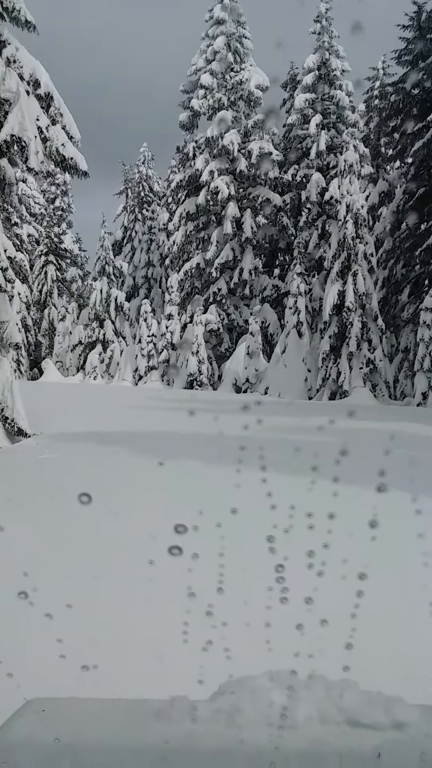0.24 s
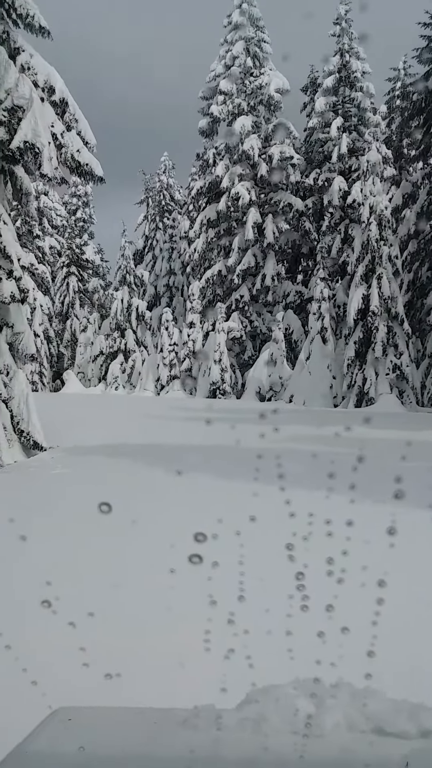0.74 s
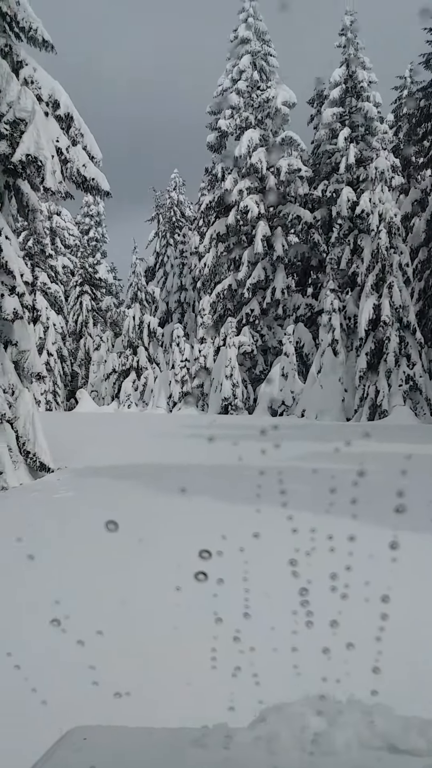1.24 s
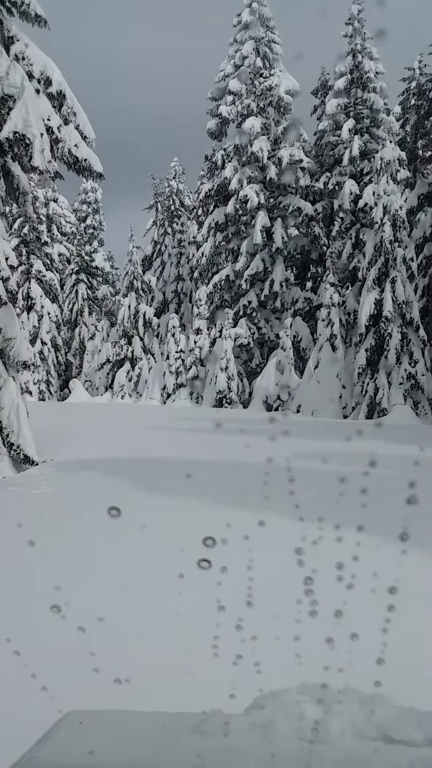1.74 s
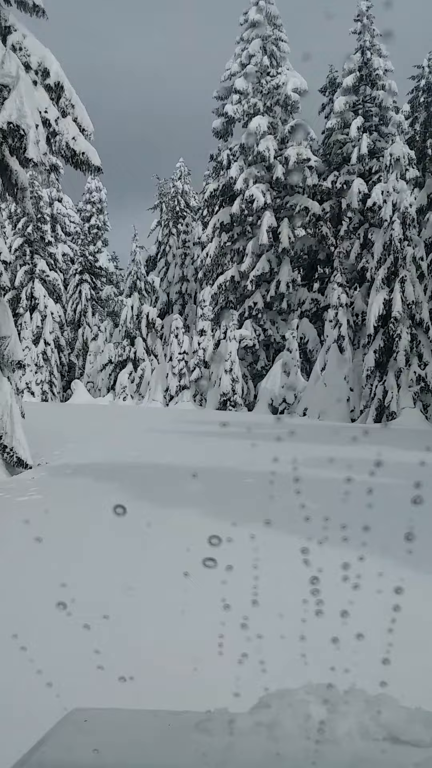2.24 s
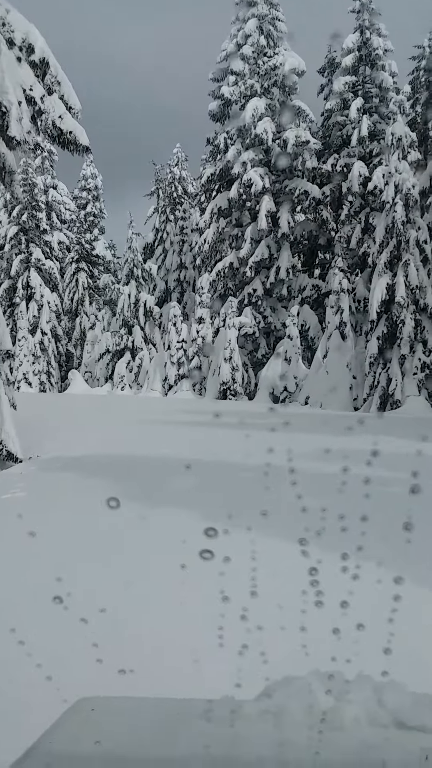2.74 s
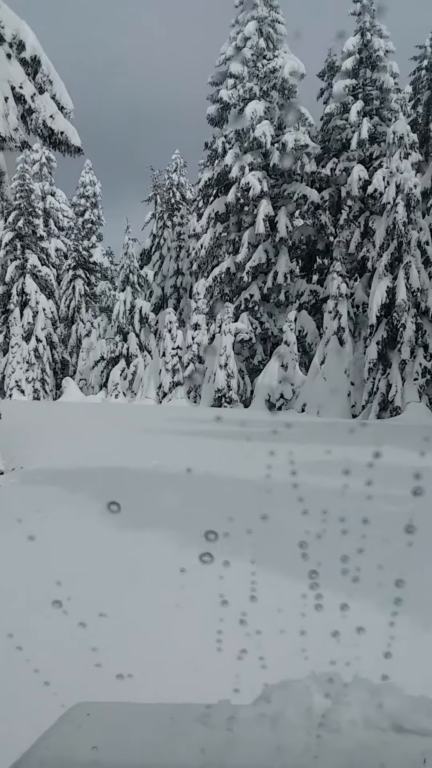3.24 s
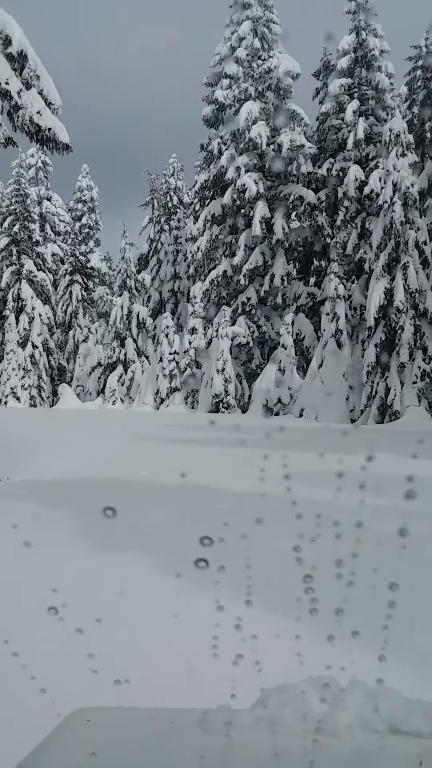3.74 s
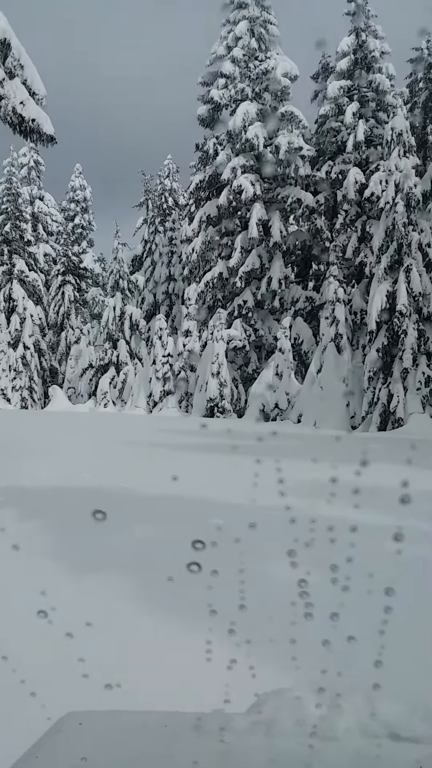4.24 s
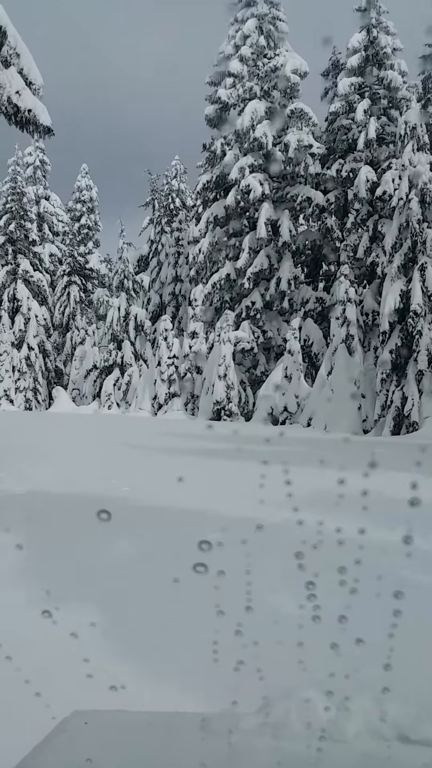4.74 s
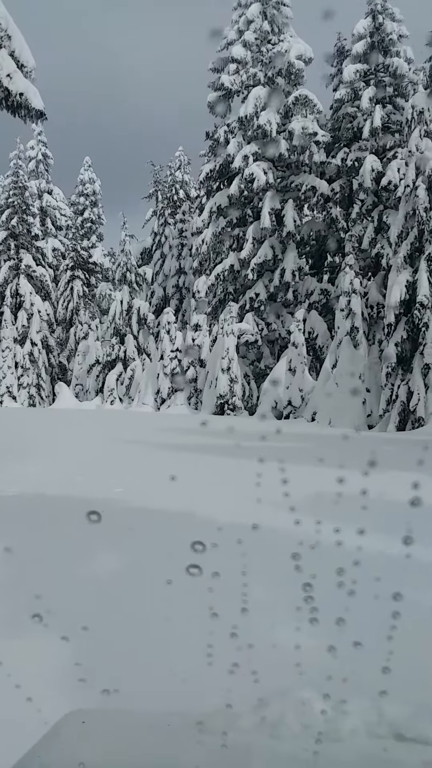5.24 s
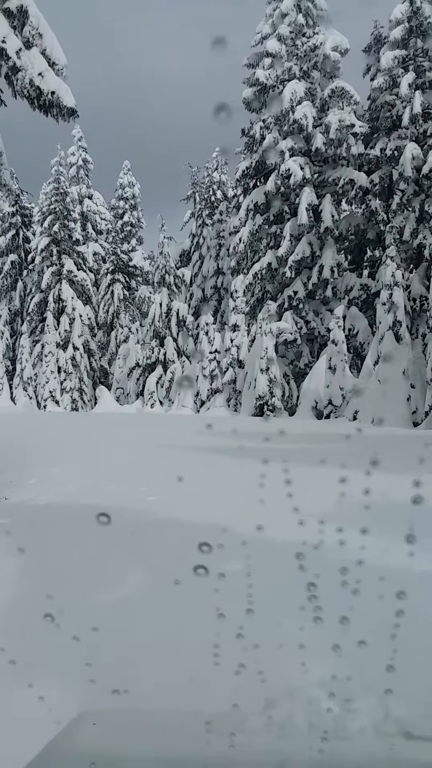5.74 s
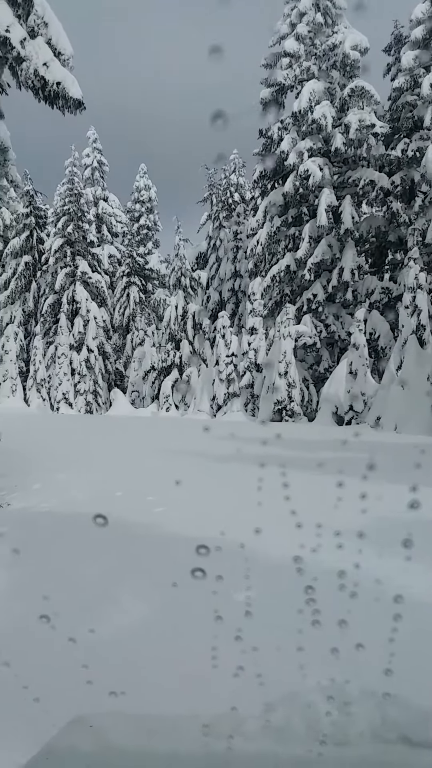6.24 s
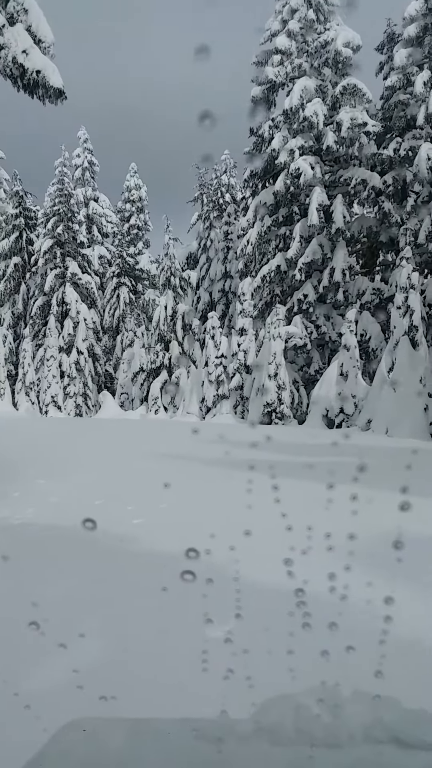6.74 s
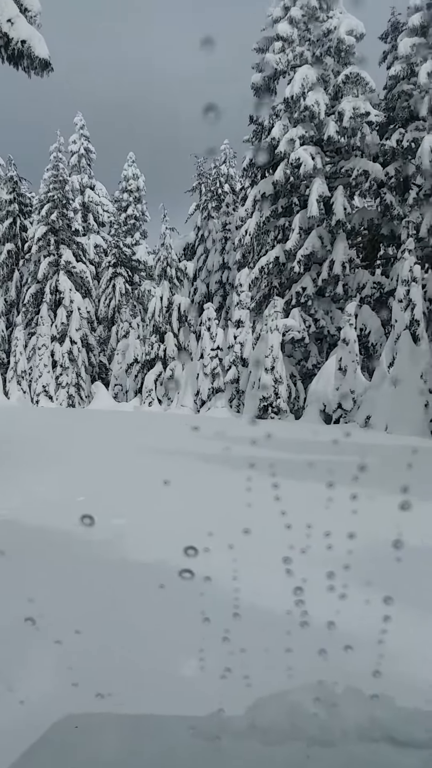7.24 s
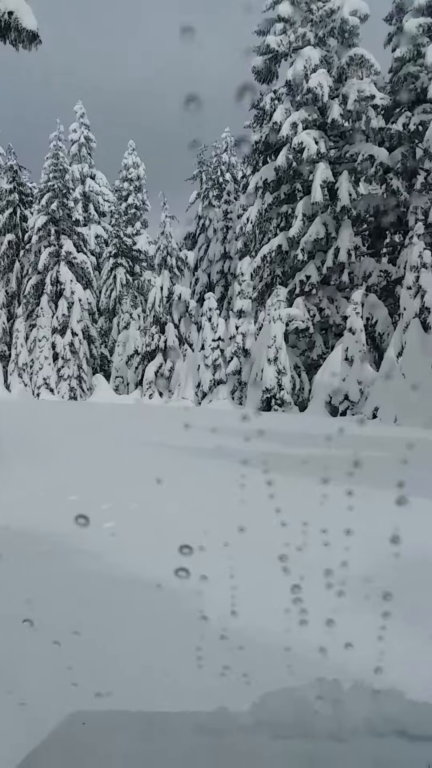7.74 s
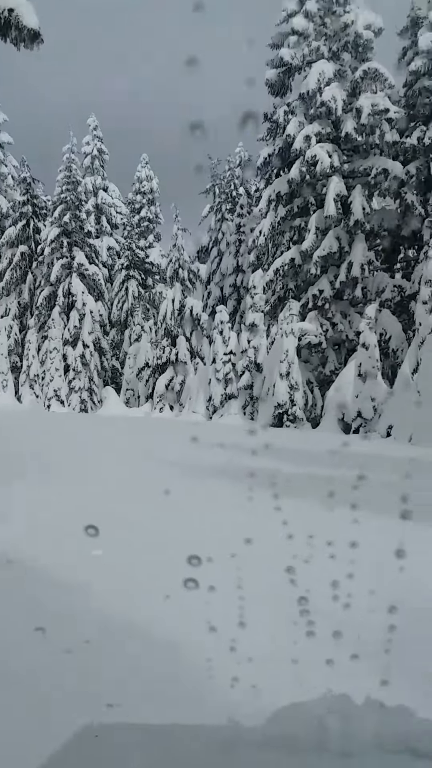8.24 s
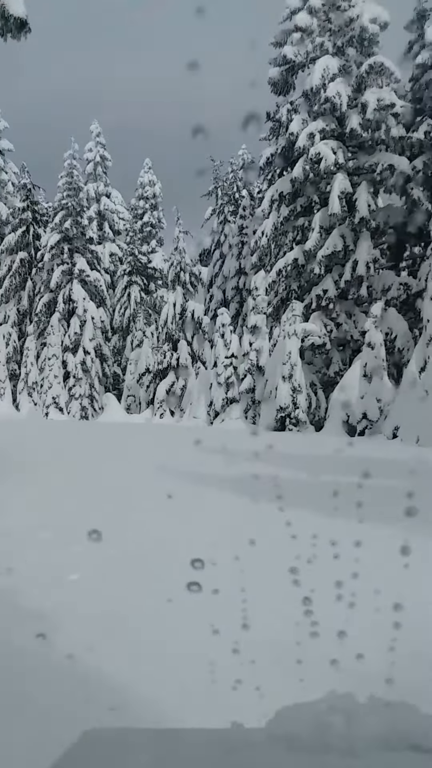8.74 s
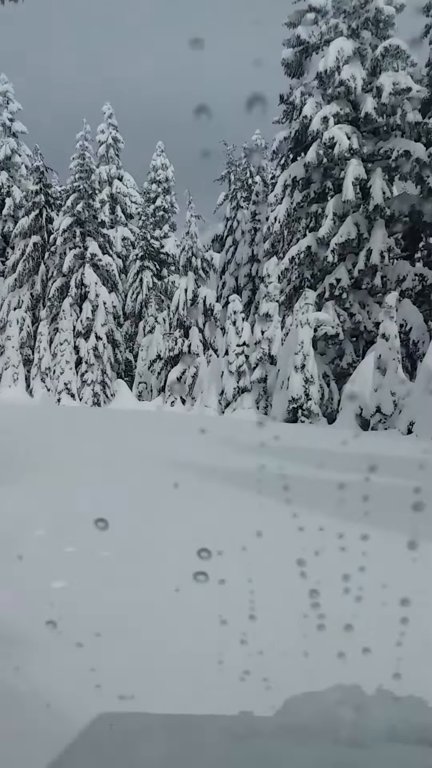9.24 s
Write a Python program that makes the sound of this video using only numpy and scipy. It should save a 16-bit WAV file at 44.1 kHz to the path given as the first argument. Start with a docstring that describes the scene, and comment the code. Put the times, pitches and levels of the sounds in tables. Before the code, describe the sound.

Inside a tracked snow vehicle's cab, a loud steady engine drone sags under load and partly recovers, over track rumble, panel rattle and hiss.

```python
"""Inside the cab of a tracked snow vehicle crawling uphill, two microphones a little apart.
A four-cylinder engine drones under the floor: sines at its firing orders sag and recover with its speed.
Belt-driven fan and pumps add tones of their own; combustion roar rings all the cab's panel modes, knocks
some of them. Behind lies coloured noise: track rumble, clatter and air hiss, swelling once as the tracks
lurch over a hump. The recorder limits the peaks."""
import sys
import numpy as np
from scipy import signal
from scipy.fft import rfft, irfft, next_fast_len
from scipy.io import wavfile
from scipy.ndimage import uniform_filter1d

SR = 44100
rng = np.random.default_rng(int(sys.argv[2]) if len(sys.argv) > 2 else 0)


def dump_mix(stems):
    """Bounce the given channels to the path in sys.argv[1] as a 16-bit WAV at rate SR."""
    frames = np.atleast_2d(stems).T  # one column per channel
    limited = np.clip(frames, -1, 1)  # hard clip at full scale
    pcm = np.round(limited * 32767).astype(np.int16)
    wavfile.write(sys.argv[1], SR, pcm)


N = 418950

# load rises from idle to full as the firing rate sags from easy to lugging, a moment late
EASY_HZ, LUGGING_HZ, LOAD_LAG_S, IDLE_LOAD = 87.8, 84.9, 0.055, 0.11
SLOWEST_HZ = 82.8    # tones that grow much under load peak here
COARSE = 8           # tones stay low, so every 8th sample carries them
KNOCK_TURNS = .37    # knocks and hiss puffs come ahead by this part of a firing
KNOCK_DB, ROAR_DB, BED_DB = -34, -24, -14.5    # rms of each layer

# floor panels lift or swallow any tone that glides through their resonance: (f/Hz, half-width/Hz, lift/dB)
FLOOR_PANELS = [(228.5, 2.5, -5), (444, 7, -4), (564, 15, 9), (349, 5, -6), (838, 10, 2), (938, 14, 3),
                (1045, 18, -10)]


def from_db(db):
    """Decibels to gain."""
    return 10 ** (np.asarray(db) / 20)


def rms_one(x):
    """Scale to unit rms."""
    return x / np.sqrt(np.mean(x ** 2) + 1e-20)


def at_hz(points, hz):
    """Read a table on a log-frequency axis."""
    table_hz, values = np.transpose(points)
    return np.interp(np.log(hz), np.log(table_hz), values)


def drift(corner_hz, step=1):
    """Slow chance: noise at every 40th sample through a double one-pole low-pass; spread 1."""
    pole = np.exp(-2 * np.pi * corner_hz * 40 / SR)
    white = rng.standard_normal(N // 40 + 2002)
    slow = signal.lfilter([1], [1, -2 * pole, pole ** 2], white)[2000:]    # drop the settling
    return np.interp(np.arange(0, N, step) / 40, np.arange(len(slow)), rms_one(slow - slow.mean()))


def lurches():
    """The tracks lurch over a hump: a bell-shaped swell in dB."""
    # humps under the tracks: (t/s, swell/dB)
    humps = [(6.8, 6.5)]
    half_width_s = 0.15
    t = np.arange(N) / SR
    return sum(swell_db * np.exp(-((t - s) / half_width_s) ** 2) for s, swell_db in humps)


def noise_bed(firings, swell_db, bumps):
    """Rumble, clatter and hiss: stereo noise in overlapping bands, each with its own level and flicker."""
    # spectrum of rumble and hiss before the layer is levelled: (f/Hz, level per Hz/dB)
    spectrum = [(25, -32), (48, -20), (54, -5.5), (100, -5.5), (122, -9), (165, -4.5), (215, -8.5),
                (280, -15), (315, -14.5), (370, -18), (430, -18), (490, -23), (600, -30), (1100, -29.5),
                (1700, -37), (2200, -37), (3250, -41), (4000, -42), (5700, -47.5), (7400, -45.5),
                (8600, -50), (9700, -58), (13000, -48.5), (14800, -49.5), (15600, -50)]
    # likeness of the two microphones: (f/Hz, correlation 0 to 1)
    likeness = [(30, .99), (60, .98), (200, .95), (300, .8), (500, .7), (800, .1), (3000, .15), (12000, .3)]
    # lean to one side: (f/Hz, left minus right/dB)
    leaning = [(30, -3), (60, 0), (200, 4), (500, 1.5), (1000, -1), (2000, 1.5), (4000, -3), (6000, -2.5),
               (10000, 0.5), (14000, -5)]
    rumble_db, clatter_db, hiss_db = -0.52, 2.0, -1.4
    valve_db, puff_db, flicker_db = .6, .5, 1.0
    lag_s = .0004    # the left microphone hears the hiss later

    size = next_fast_len(N)
    hz = np.fft.rfftfreq(size, 1 / SR) + 1
    mid, side = rfft(rng.standard_normal((2, size)))
    alike = np.clip(at_hz(likeness, hz), 0, 1)
    pair = np.sqrt(1 + alike) * mid + np.sqrt(1 - alike) * side * [[1], [-1]]
    pair[0] *= np.exp(-2j * np.pi * np.maximum(hz - 600, 0) * lag_s)    # lag only above the cab's boom
    pair *= from_db(at_hz(spectrum, hz) + at_hz(leaning, hz) / 2 * [[1], [-1]])

    shaken_db = hiss_db + .3 * swell_db + 0.15 * bumps
    valve_gear_db = valve_db * np.cos(np.pi * firings)    # pulses every second firing
    puffs_db = puff_db * np.cos(2 * np.pi * (firings + KNOCK_TURNS))
    bands = [(40, rumble_db + swell_db), (160, rumble_db + swell_db), (640, clatter_db + swell_db / 2),
             (2560, shaken_db + valve_gear_db), (10240, shaken_db + puffs_db)]
    out = np.zeros((2, N))
    for centre_hz, band_db in bands:
        # each band fades out two octaves from its centre; the outer ones run on to the ends
        distance = abs(np.log(np.clip(hz, 40, 10240) / centre_hz) / np.log(4))
        share = np.clip(1 - distance, 0, 1)
        out += from_db(band_db + flicker_db * drift(11.4)) * irfft(pair * share, size)[:, :N]
    return from_db(BED_DB) * rms_one(out)


def knocks(firings):
    """One click per firing, a little early or late, each cylinder with its own strength."""
    # knock strength of each cylinder in firing order, relative: (level/dB)
    cylinders_db = [0.5, -4, 1.5, -2.5]
    at = np.flatnonzero(np.diff(np.floor(firings + KNOCK_TURNS)))
    chance = rng.standard_normal((len(at), 2))
    shift = (.00004 * SR * chance[:, 1]).astype(int)    # 40 microseconds spread
    clicks = np.zeros(N)
    clicks[np.clip(at + shift, 0, N - 1)] = from_db(np.resize(cylinders_db, len(at)) + 2.5 * chance[:, 0])
    return clicks


def roar_gate(firings, swell_db, bumps):
    """Gain of the combustion roar: it swells at each firing and shakes with the ride."""
    pulse = 1 + .08 * np.cos(2 * np.pi * firings + 1.8)
    return from_db(0.15 * swell_db + 0.35 * bumps) * pulse


def cab(knock, gate):
    """Roar rings every panel mode, knocks only those from 1150 to 1700 Hz; each microphone meets a mode
    at its own level and phase."""
    # cab panel modes: (f/Hz, width/Hz, left level/dB, right level/dB, left leads/turns)
    modes = [(561, 26, -3.5, -8.5, -0.098), (627, 17, -7, -6, -0.22), (733, 68, -6, -9, -0.25),
             (849.4, 21, -2.5, -5, -0.13), (932, 53, -5, -0.5, -0.37), (986, 24, -14, -8, -0.53),
             (1042, 36, -10, -7, 0.39), (1244, 19, -2.5, 0, 0.36), (1308, 84, -8, -15.5, 0.26),
             (1398, 31, -8, -8.5, 0.12), (1444, 40, -7.5, -2, 0.19), (1581, 38.4, -11.5, -1, 0.061),
             (1800, 69, -11.5, -5.5, 0.44), (1955, 70, -11.5, -12.5, 0.045), (2060, 62, -16, -12.5, -0.14),
             (2268, 140, -29, -15.5, 0.15), (2501, 44, -12.5, -16, 0.27), (2673, 62, -23.5, -13.5, -0.085),
             (2703, 29, -17, -19, 0.27), (2857, 55, -20.5, -38, -0.062), (3023, 76, -17, -22, -0.23),
             (3444, 60, -28, -25.5, -0.22), (3570, 73, -23.5, -20, -0.45), (3775, 50, -42, -21, 0.38),
             (4570, 42, -27.5, -25, 0.04)]
    own = 0.22 / 2           # share of a mode's roar that differs between the microphones
    panel_waver_db = 1.0     # slow unrest of each group of panels

    size = next_fast_len(N)
    hz = np.fft.rfftfreq(size, 1 / SR)
    unrest = gate * from_db([panel_waver_db * drift(1.0) for _ in range(3)])
    # neighbouring modes get unrelated roar
    roar = rfft(unrest * rng.standard_normal((3, N)), size)
    apart = rfft(unrest * rng.standard_normal((3, N)), size)
    knock = rfft(knock, size)
    knocked, roaring = np.zeros((2, 2, len(hz)), complex)
    for k, (mode_hz, width_hz, left_db, right_db, turns) in enumerate(modes):
        near = slice(*np.searchsorted(hz, [mode_hz / 2, mode_hz * 2]))
        peak = 1 / (1 + 2j * (hz[near] - mode_hz) / width_hz) * (-1) ** k
        peak *= np.cos(np.pi / 2 * np.log2(hz[near] / mode_hz)) ** 2    # skirts die out within an octave
        left = from_db(left_db) * np.exp(2j * np.pi * turns)
        ringing = np.array([[left], [from_db(right_db)]]) * peak
        if 1150 < mode_hz < 1700:    # the knock rings the block's own range of modes
            knocked[:, near] += ringing * knock[near]
        shared_roar = np.sqrt(1 - own) * roar[k % 3, near]
        own_roar = np.sqrt(own) * apart[k % 3, near] * [[1], [-1]]
        roaring[:, near] += ringing * (shared_roar + own_roar)
    knocked = rms_one(irfft(knocked, size)[:, :N])
    roaring = rms_one(irfft(roaring, size)[:, :N])
    return from_db(KNOCK_DB) * knocked + from_db(ROAR_DB) * roaring


def tones(multiples, rows, firings, load, shaping, spread, waver_db, waver_rad):
    """Sines locked to the crank; upper orders of one pressure pulse arrive spread out in phase."""
    # standing waves set the microphones apart in phase for a tone: (f/Hz, left leads/turns)
    port_turns = [(85, .035), (170, -.01), (500, -.04), (835, -.08), (865, -.46), (900, -.36), (935, -.2),
                  (1010, -.3), (1075, .13)]
    spread_knee, sharpen_rad = 2.5, .7    # multiple where the spread turns linear; fall-back when lugging

    firings, load = firings[::COARSE], load[::COARSE]
    rate = np.gradient(firings) * SR / COARSE
    lugging = np.clip((EASY_HZ - rate) / (EASY_HZ - SLOWEST_HZ), 0, 1) ** 1.6
    out = np.zeros((2, len(load)))
    for multiple, (light_db, full_db, pan_db) in zip(multiples, rows):
        tone_hz = multiple * rate
        unsteady = np.clip(multiple - .7, .2, 2)    # higher tones waver more
        strain = lugging if full_db > light_db + 6 else load    # strongly growing tones come in late
        level_db = light_db + strain * (full_db - light_db)
        level_db += waver_db * unsteady * drift(5.6, COARSE)
        for hz, width_hz, lift_db in shaping:
            level_db += lift_db * np.exp(-((tone_hz - hz) / width_hz) ** 2)

        angle = 2 * np.pi * multiple * firings + waver_rad * unsteady * drift(2.9, COARSE)
        bent = min(multiple, spread_knee)
        angle += spread * bent * (2 * multiple - bent) - sharpen_rad * lugging * (multiple > 1)
        # cylinders differ in timing, which sets in-between orders in quadrature
        angle += np.pi / 2 * (multiple % 1 > 0)
        lead = np.pi * at_hz(port_turns, tone_hz) * [[1], [-1]]
        gain = from_db(level_db + [[pan_db / 2], [-pan_db / 2]])
        out += np.sqrt(2) * gain * np.cos(angle + lead)
    return signal.resample_poly(out, COARSE, 1, axis=1)[:, :N]


def accessories(firings, load):
    """Belt-driven fan and pumps turn at fixed ratios to the crank, so their tones glide with it."""
    # multiples of the firing rate, one a tone: (ratio)
    ratios = [1.21, 1.86, 2.42, 2.78, 2.84, 5.18, 5.68, 6.53, 10.37]
    # tone levels before floor and waver: (light load rms level/dB, full load rms level/dB, left minus right/dB)
    levels = [(-29, -35, 0), (-27, -29, 0), (-33, -32, 0), (-23, -24, 6), (-25.5, -21, 3), (-30, -33, 4),
              (-39.5, -48, 1), (-47, -46, -2), (-50, -39, -4)]
    return tones(ratios, levels, firings, load, FLOOR_PANELS, spread=0, waver_db=.5, waver_rad=.12)


def engine(firings, load):
    """Firing pulses under the floor as a sum of engine orders, coloured by floor and exhaust pipe."""
    # engine orders before colouring and waver:
    # (quarters of the firing rate, light load rms level/dB, full load rms level/dB, left minus right/dB)
    orders = np.array([(4, -11.5, -10, -1), (5, -36, -32, 1), (6, -36, -33, 1), (7, -24, -27, 1),
                       (8, -12.5, -22.5, .5), (9, -35, -27, 0), (12, -18.5, -23, -1.5), (13, -34, -30, -5),
                       (14, -40, -33, -5.5), (16, -33, -24.5, 1.5), (17, -39, -44, -1), (18, -43, -42, -2),
                       (20, -35, -35.5, 3), (22, -44, -50, 6), (24, -43, -42, 5), (25, -50, -44, 3),
                       (28, -36.5, -52, 4), (29, -44, -52, 5), (31, -48, -55, 3), (32, -38.5, -47, 4),
                       (33, -44, -54, 6), (34, -50, -43, -2), (36, -41.5, -44, 1), (38, -38, -49, -3),
                       (39, -46, -46, 0), (40, -34.5, -36, 3), (42, -43, -42, 0), (44, -45, -38.5, -10),
                       (46, -52, -49, -3), (48, -41, -48, 3), (50, -52, -50, 0), (52, -54, -49, 0)])
    # the exhaust pipe swallows engine orders at its trough: (f/Hz, half-width/Hz, lift/dB)
    exhaust = [(248, 5, -8)]
    return tones(orders[:, 0] / 4, orders[:, 1:], firings, load, FLOOR_PANELS + exhaust,
                 spread=.52, waver_db=.5, waver_rad=.06)


def climb():
    """Engine speed sags on the climb and slowly recovers; gives running count of firings and load."""
    # engine speed: (t/s, firing rate f/Hz)
    drive = [(0, 90.4), (.8, 89.7), (1.4, 90.0), (2.1, 89.6), (2.9, 89.35), (3.3, 88.5), (3.8, 87.8),
             (4.4, 87.3), (4.75, 86.5), (5.05, 86.4), (5.4, 85.3), (5.85, 82.7), (6.2, 82.15),
             (6.75, 83.15), (7.2, 83.6), (7.75, 84.65), (8.6, 85.3), (9.2, 85.45), (9.5, 86.3)]
    s, firing_hz = np.transpose(drive)
    t = np.arange(N) / SR
    firings = np.cumsum(np.interp(t, s, firing_hz)) / SR
    earlier_hz = np.interp(t, s + LOAD_LAG_S, firing_hz)
    load = np.clip((EASY_HZ - earlier_hz) / (EASY_HZ - LUGGING_HZ), IDLE_LOAD, 1)
    return firings, load


def scene():
    """Noise bed, cab ringing, accessories and engine, all following one climb."""
    firings, load = climb()
    swell_db = lurches()
    bumps = drift(16)    # the ride shakes panels and air leaks together
    background = noise_bed(firings, swell_db, bumps)
    ringing = cab(knocks(firings), roar_gate(firings, swell_db, bumps))
    return background + ringing + accessories(firings, load) + engine(firings, load)


def record(dry):
    """A limiter ducks both channels around peaks; what is left is rounded and clipped; the top is cut."""
    ceiling_db, release_db_s, round_level, cutoff_hz = 1.1, 38, 1.3, 15640
    dry = dry * np.minimum(np.arange(N) / (.004 * SR), 1)    # the input opens without a click
    over_db = np.maximum(20 * np.log10(abs(dry).max(axis=0) + 1e-9) - ceiling_db, 0)
    ramp = release_db_s * np.arange(N) / SR
    duck_db = np.maximum.accumulate(over_db + ramp) - ramp    # instant attack, steady release
    duck_db = uniform_filter1d(duck_db, size=221)
    duck_db = uniform_filter1d(duck_db, size=221, origin=-110)    # looks ahead
    ducked = dry * from_db(-duck_db) / round_level
    rounded = round_level * ducked / (1 + ducked ** 4) ** (1 / 4)
    top_cut = signal.ellip(14, .5, 60, cutoff_hz, fs=SR, output="sos")
    return signal.sosfilt(top_cut, np.clip(rounded, -1, 1))


dry = scene()
out = record(dry)
dump_mix(out)
```